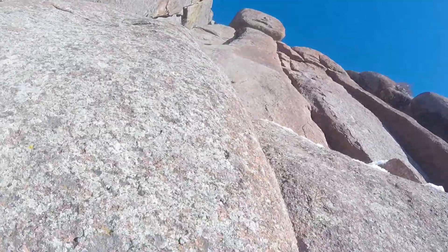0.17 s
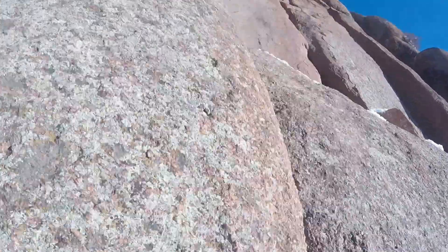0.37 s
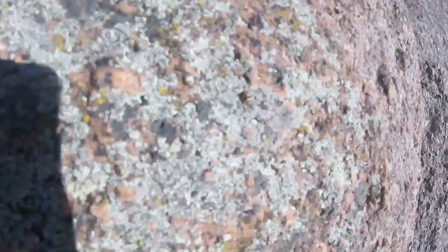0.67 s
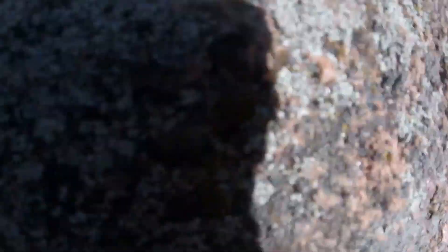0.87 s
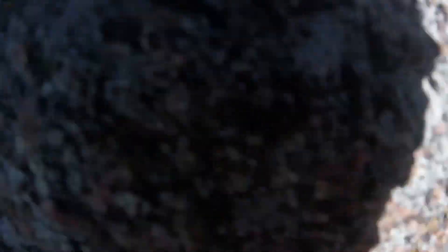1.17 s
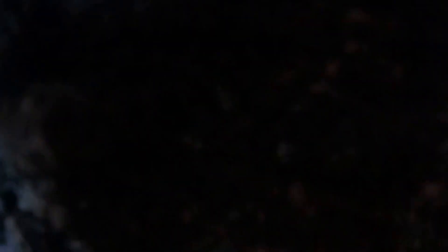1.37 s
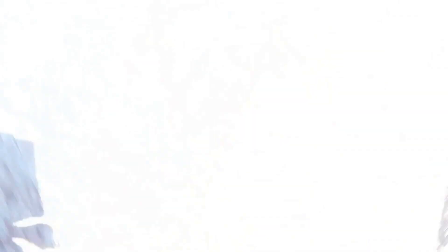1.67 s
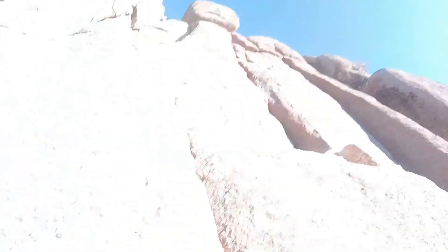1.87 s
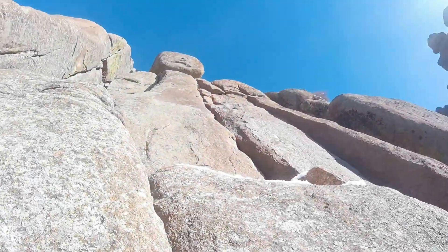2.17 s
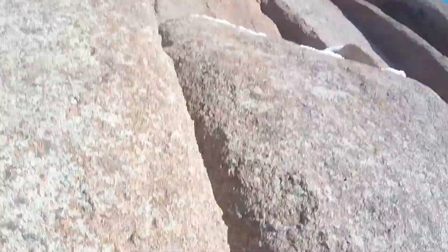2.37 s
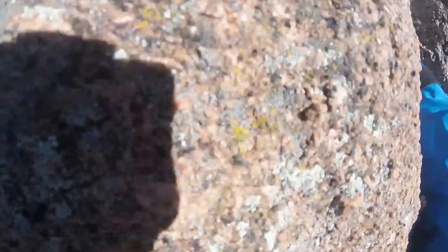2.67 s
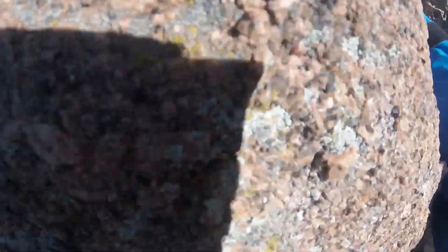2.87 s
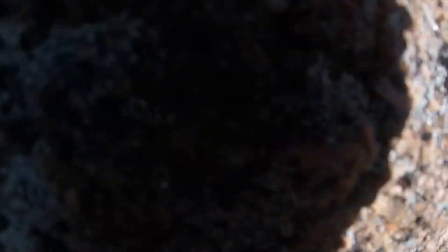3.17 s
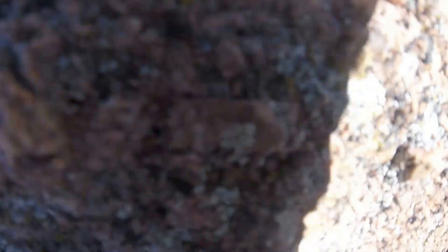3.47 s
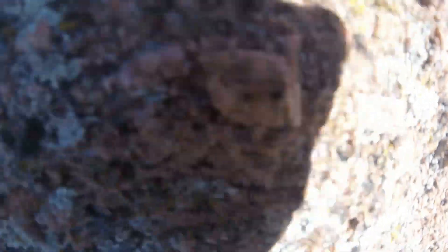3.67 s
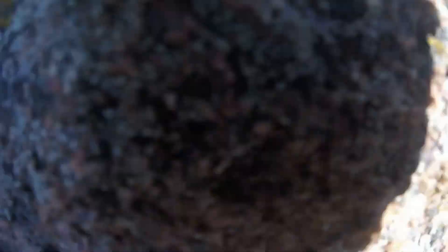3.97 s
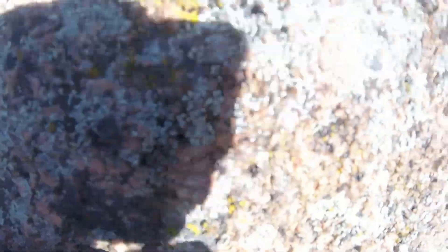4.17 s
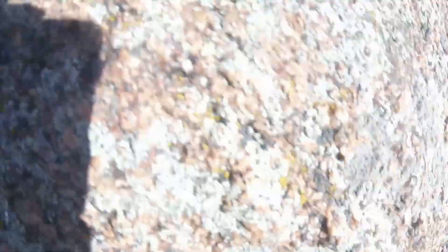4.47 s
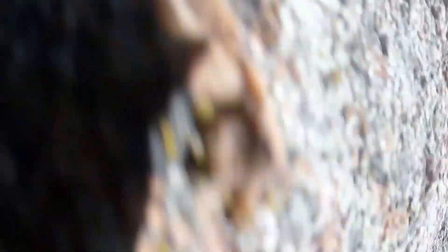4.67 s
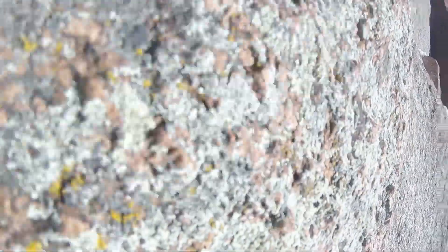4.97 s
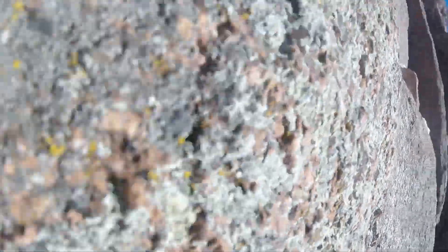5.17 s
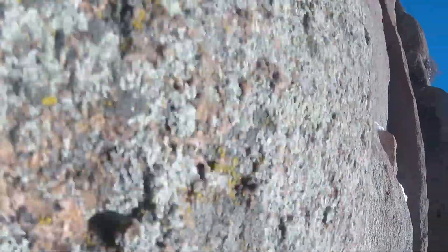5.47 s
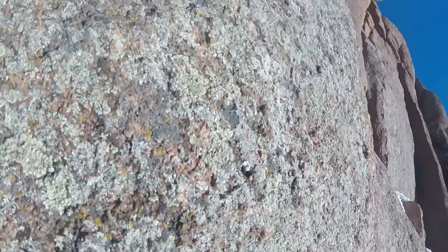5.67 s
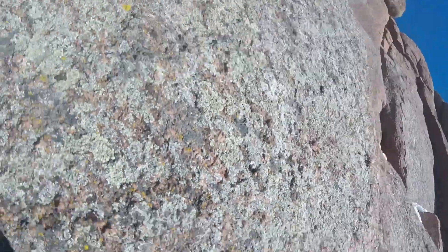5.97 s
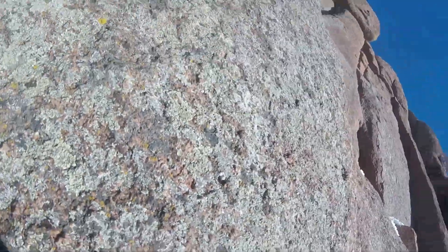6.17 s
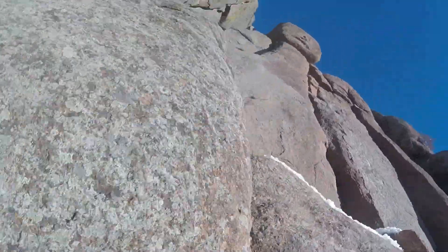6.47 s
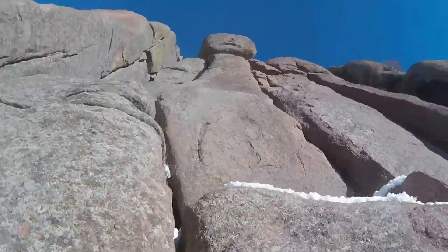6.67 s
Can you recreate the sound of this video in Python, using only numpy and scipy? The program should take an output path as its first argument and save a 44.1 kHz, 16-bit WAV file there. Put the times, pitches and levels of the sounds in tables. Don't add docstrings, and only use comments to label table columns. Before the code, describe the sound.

Wind thumps and roars on a close microphone while a helmet knocks and scrapes hard on rough rock, with faint metal gear ringing and cloth rustling.

```python
import sys
import numpy as np
from scipy import signal
from scipy.fft import rfft, irfft, next_fast_len
from scipy.io import wavfile
from scipy.ndimage import uniform_filter1d, map_coordinates

SR = 44100
rng = np.random.default_rng(int(sys.argv[2]) if len(sys.argv) > 2 else 0)


def voltage_ratio(decibels):
    exponent = np.asarray(decibels, float) / 20
    return 10 ** exponent


def to_wav(s):
    ch = np.atleast_2d(s).T
    pcm = np.round(np.clip(ch, -1, 1) * 32767)
    wavfile.write(sys.argv[1], SR, pcm.astype(np.int16))


N = 300321
TIME = np.arange(N) / SR

# (frequency [Hz], density [dB per Hz])
GRIT_SPECTRUM = [(410, -27), (700, -8), (1100, -1.5), (1300, 1), (1700, -2), (2300, 4.5), (2900, -9),
                 (3400, -1.5), (4000, -22), (5000, -39.5)]
# (frequency [Hz], density [dB per Hz])
SHELL_SPECTRUM = [(40, -29.5), (100, -0.5), (160, -1), (300, 0), (630, -11), (1000, -23), (2000, -87.5)]
# (frequency [Hz], density [dB per Hz])
EDGE_SPECTRUM = [(2800, -27), (3900, 2), (4500, -6), (5200, -1), (6500, -11.5), (7500, -25), (9000, -49)]
# (frequency [Hz], density [dB per Hz])
SPARK_SPECTRUM = [(10500, -40), (12000, -4.5), (13200, 0.5), (14300, -3.5), (15000, -52)]
# (frequency [Hz], density [dB per Hz])
RUSTLE_SPECTRUM = [(410, -42), (700, -14.5), (1080, -4.5), (1320, 3), (1630, -3.5), (2200, 1), (3670, -11),
                   (4020, -8.5), (4440, -15.5), (5070, -13.5), (10000, -38), (13000, -46), (22000, -120)]


def unit(x):
    return x / np.sqrt(np.mean(x ** 2) + 1e-20)


def curves(rows):
    s, *cols = np.transpose(rows)
    return [np.interp(TIME, s, c) for c in cols]


def wobble(rate):
    knots = rng.standard_normal(int(N * rate / SR) + 4)
    return map_coordinates(knots, [TIME * rate])


def filtered(x, response):
    m = next_fast_len(N + SR // 2)
    return irfft(rfft(x, m) * response(np.fft.rfftfreq(m, 1 / SR)), m)[:N]


def coloured(x, spectrum):
    f, db = np.transpose(spectrum)
    return unit(filtered(x, lambda hz: voltage_ratio(np.interp(np.log(hz + 1), np.log(f + 1), db, -120, -120))))


def grains(per_s, spread_db, bed):
    happens = rng.random(N) < per_s / SR
    size = voltage_ratio(spread_db * rng.exponential(size=N))
    slips = happens * size * rng.standard_normal(N)
    return unit(slips) + bed * rng.standard_normal(N)


def resonance(hz, centre, width):
    return 1j * hz * width / (centre ** 2 - hz ** 2 + 1j * hz * width)


def add(out, s, sound):
    part = out[round(s * SR):][:len(sound)]
    part += sound[:len(part)]


def joined(tables, fade):
    rows = []
    for k, table in enumerate(tables):
        if k == 0 or table[0][0] - rows[-1][0] > 2 * fade:
            if rows:
                rows += [(rows[-1][0] + fade, -110, *rows[-1][2:])]
            rows += [(table[0][0] - fade / 2, -110, *table[0][2:])]
        rows += table
    return rows + [(rows[-1][0] + fade, -110, *rows[-1][2:])]


def strokes(tables, fade):
    return uniform_filter1d(curves(joined(tables, fade)), size=60, axis=1)


def knocks():
    # (time [s], peak [dB], frequency [Hz], t60 [s])
    pulls = [(1.4816, -20, 250, 0.023), (1.4864, 7.5, 440, 0.0051), (1.4894, 6, 560, 0.0045),
             (3.3396, 4.5, 424, 0.006), (1.4925, -16, 42, 0.14), (4.8606, -7, 198, 0.013),
             (4.86, -5, 44.2, 0.14), (4.877, -5, 147, 0.11), (4.8975, -1, 150, 0.054),
             (4.922, -11.5, 95, 0.18), (5.261, -15.5, 60, 0.081)]
    # (time [s], peak [dB], frequency [Hz], t60 [s])
    pushes = [
        (1.4866, 3, 205, 0.011),
        (1.4832, -13, 90, 0.03),
        (3.3397, 2, 52, 0.071),
        (3.3407, 0.5, 270, 0.017),
        (4.869, 1.5, 70, .05),
        (5.274, -7, 110, 0.019),
        (5.284, -6, 115, 0.082),
    ]
    # (time [s], peak [dB], frequency [Hz])
    bumps = [(1.546, -19.5, 250), (1.648, -31.5, 116), (1.892, -33.5, 120), (2.408, -35, 121),
             (2.571, -36, 109), (3.214, -43.5, 243), (4.066, -33, 398), (5.2064, -20, 135),
             (5.344, -18.5, 122), (5.683, -42.5, 130), (6.058, -37.5, 277)]
    bump_cycles = 7
    blow_rise_cycles, bump_rise_cycles = 0.045, 0.42
    nudges = [(s, db + 3.5, hz, bump_cycles / hz) for s, db, hz in bumps]
    groups = (-1.01, blow_rise_cycles, pulls), (0.93, blow_rise_cycles, pushes), (-1.04, bump_rise_cycles, nudges)
    out, t = np.zeros(N), TIME[:SR // 2]
    for swing, rise, blows in groups:
        for s, db, hz, t60 in blows:
            onset = 1 - np.exp(-t * hz / rise)
            add(out, s, swing * voltage_ratio(db - 60 * t / t60) * np.sin(2 * np.pi * hz * t) * onset)
    return out


def drag():
    # (time [s], pressure [dB], sharpness [dB])
    scrapes = [
        [(1.482, -29.5, -40), (1.485, -24, -28), (1.494, -25, -28), (1.5, -41, -22), (1.514, -53.5, -59.5),
         (1.53, -49.5, -64.5)],
        [(1.535, -52.5, -50), (1.575, -43, -36), (1.599, -55.5, -38), (1.62, -76, -29), (1.648, -60, -22),
         (1.658, -60, -28), (1.668, -80, -39)],
        [(3.341, -17.5, -36), (3.354, -29.5, -29), (3.391, -30.5, -32.5), (3.41, -32, -28), (3.428, -35, -30),
         (3.44, -58, -39)],
        [(4.861, -28, -40.5), (4.866, -23, -46.5), (4.89, -25.5, -34), (4.913, -22, -26), (4.917, -14.5, -18),
         (4.935, -28.5, -19.5), (4.963, -45.5, -54.5), (5.0, -68.5, -49.5)],
        [(5.203, -46, -42), (5.237, -49, -46), (5.262, -41.5, -48), (5.284, -19, -61), (5.3, -31.5, -66),
         (5.31, -39, -59)],
        [(5.311, -33.5, -60), (5.356, -34, -62), (5.375, -71, -44)],
    ]
    # (hollow body over grit [dB], edge over grit [dB])
    contact_balance = [
        (10.5, -14),
        (20.5, -8.5),
        (12, -13.5),
        (13.5, -13),
        (10.5, -9),
        (-4.5, -10),
    ]
    edge_follows = 0.48
    body_stays = 0.088
    marked = []
    for stroke, (body_db, edge_db) in zip(scrapes, contact_balance):
        usual_db = np.median(stroke, axis=0)[1]
        marked.append([(s, db, sharp_db, body_db - body_stays * (db - usual_db), edge_db)
                       for s, db, sharp_db in stroke])
    grit_db, sharp_db, body_db, edge_db = strokes(marked, fade=0.0056)
    slips = voltage_ratio(2.2 * wobble(250)) * grains(2500, 1.8, bed=1.4)
    grit = coloured(slips, GRIT_SPECTRUM)
    body = voltage_ratio(body_db - 5.0) * coloured(rng.standard_normal(N), SHELL_SPECTRUM)
    edge = voltage_ratio(edge_db + edge_follows * (sharp_db + 31.5)) * coloured(slips, EDGE_SPECTRUM)
    return voltage_ratio(grit_db - 7.5) * (grit + body + edge) + fizzing(grit_db + sharp_db - 2)


def fizzing(level_db):
    # (frequency [Hz], density [dB per Hz])
    fizz_spectrum = [(5500, -38.5), (7000, -2), (8500, -1.5), (10500, -2), (12000, -13), (13000, -39.5)]
    top_db = np.clip(1.2 * (level_db + 46.5), -25, 1.5)
    fizz = coloured(rng.standard_normal(N), fizz_spectrum)
    spark = coloured(rng.standard_normal(N), SPARK_SPECTRUM)
    return voltage_ratio(level_db) * (fizz + voltage_ratio(top_db) * spark)


def cracks():
    # (time [s], peak [dB], edge [dB], spark over peak [dB])
    breaks = [(1.4866, -4.5, -9.5, -35), (1.4887, -10, -19.5, -39.5), (1.5439, -62, -7, -45),
              (1.6516, -47.5, -10, -35), (2.442, -64, 15.5, -40), (3.339, -10.5, -14, -36),
              (3.4252, -27, -4, -52), (3.684, -61.5, 6.5, -40), (4.8658, -20.5, -17.5, -46),
              (4.8857, -10, -16.5, -45), (4.8984, -11, -15.5, -33.5), (4.9058, -14, -21.5, -22),
              (4.917, -6, -10.5, -20.5), (4.9193, -5.5, -15.5, -25.5), (4.9295, -30.5, -23, -29.5),
              (5.2404, -36.5, -13.5, -50), (5.2809, -16, -30, -75), (5.2884, -19, -32, -67.5),
              (5.3526, -25, -34, -52)]
    t60_s, rise_s = 0.008, 0.0004
    colours = GRIT_SPECTRUM, EDGE_SPECTRUM, SPARK_SPECTRUM
    noises = [coloured(rng.standard_normal(N), colour) for colour in colours]
    gain, t = np.zeros((3, N)), TIME[:SR // 20]
    for s, db, edge_db, spark_db in breaks:
        burst = voltage_ratio(db + 2.0) * (1 - np.exp(-t / rise_s)) ** 2
        for part, share_db, lasts in zip(gain, (0, edge_db + 4.5, spark_db), (1, 1, 1.3)):
            add(part, s, burst * voltage_ratio(share_db - 60 * t / (lasts * t60_s)))
    return (gain * noises).sum(axis=0)


def metal():
    # (frequency [Hz], level [dB], t60 [s])
    modes = [(1777, 1, 0.5), (1822, -12, .5), (2213, -9.5, 0.3), (2490, -14.5, 0.15), (2659, -14.5, 0.22)]
    # (time [s], level [dB], third, fourth and fifth mode over their usual share [dB])
    strikes = [
        (1.488, -39, -10, -15.5, 6),
        (3.4, -52, 6, -5, 14),
        (4.935, -47, 5, 6, 10),
        (5.3, -55, 1, -6, 8),
    ]
    out, t = np.zeros(N), TIME[:SR // 2]
    onset = 1 - np.exp(-t / 0.003)
    for s, db, *upper_db in strikes:
        for (hz, level, t60), extra_db in zip(modes, [0, 0, *upper_db]):
            envelope = voltage_ratio(db + level + extra_db - 72 * t / t60) * onset
            add(out, s, envelope * np.sin(2 * np.pi * hz * t))
    return out


def ticks():
    # (time [s], peak [dB], lowest mode [dB], second mode [dB])
    gear_taps = [(2.3808, -53, -11, -15), (2.494, -66, 2, -15), (2.6135, -56, -12, -10),
                 (3.244, -47.5, -10, -15), (4.0687, -56.5, -2.5, -19), (4.547, -32.5, -19, -23),
                 (4.6237, -33, -21, -19), (5.2086, -41.5, -10.5, -11), (5.221, -42.5, -25, -20),
                 (5.24, -44, -24, -16.5), (5.3958, -60.5, -1, -2), (5.684, -27, -24, -17.5),
                 (5.906, -58.5, -0.5, -6), (6.0683, -51, -21.5, -17), (6.324, -46, -37, -29),
                 (6.426, -26.5, -27, -21)]
    # (frequency [Hz], width [Hz], level [dB])
    housing_modes = [(1344, 94, -8), (1953, 170, -7), (2684, 152, -11), (3375, 116, -30.5),
                     (3800, 170, -33.5), (4980, 340, -33.5)]
    s, db, low_db, second_db = np.transpose(gear_taps)
    at = np.round((s - 0.001) * SR).astype(int)
    out, contact = np.zeros(N), np.zeros(N)
    for k, (centre, width, level) in enumerate(housing_modes):
        mode_db = [low_db, second_db, *[level] * 4][k]
        taps = np.zeros(N)
        taps[at] = voltage_ratio(db + mode_db) * SR / width / 1.4
        mode = lambda hz: resonance(hz, centre, width) * resonance(hz, centre, 2.9 * width)
        out += (-1) ** k * filtered(taps, mode)
    contact[at] = voltage_ratio(db - 2.5)
    t = TIME[:SR // 40]
    puff = voltage_ratio(-60 * t / 0.014) * (1 - np.exp(-t / 0.0014)) ** 2
    rattle = signal.fftconvolve(contact, puff)[:N]
    return out + rattle * coloured(rng.standard_normal(N), RUSTLE_SPECTRUM)


def slides():
    # (start [s], end [s], frequency [Hz], width [Hz], level [dB])
    songs = [
        (.85, 1.33, 2190, 90, -70),
        (.87, 1.05, 4150, 150, -76),
        (6.07, 6.27, 2720, 80, -68),
        (6.5, 6.63, 3980, 120, -72),
        (6.66, 6.81, 3950, 120, -71),
        (6.52, 6.81, 3300, 120, -74),
        (5.11, 5.165, 3400, 150, -79),
        (5.165, 5.21, 3330, 100, -75),
    ]
    out = np.zeros(N)
    for start, end, hz, width, db in songs:
        tone = unit(filtered(rng.standard_normal(N), lambda f: resonance(f, hz, width) ** 2))
        tone = unit(tone / np.sqrt(0.4 + np.abs(uniform_filter1d(tone ** 2, size=500))))
        fade = np.clip(np.minimum(TIME - start, end - TIME) / 0.013, 0, 1)
        out += voltage_ratio(db) * fade * tone
    return out


def cloth():
    fabric_rubs = [(0.567, .71, .79, -60, 6), (0.846, 0.953, 1.13, -58.5, -5),
                   (1.668, 1.708, 1.77, -63.5, -5), (1.83, 1.89, 2.1, -65.5, -14),
                   (2.369, 2.409, 2.53, -51, 5.5), (2.51, 2.556, 2.67, -51, -6),
                   (2.596, 2.635, 2.7, -58, -3.5), (3.215, 3.221, 2.82, -57.5, 19.5),
                   (3.3, 3.34, 3.43, -68, 24), (3.98, 4.044, 3.8, -66, 9), (4.066, 4.09, 4.3, -62, -3),
                   (5.685, 5.703, 5.8, -59.5, 5)]
    # (time [s], effort [dB], body over it [dB])
    sleeve_pull = [(6.04, -69.5, 11), (6.074, -54, 1), (6.1, -64.5, 8), (6.29, -65.5, -1),
                   (6.322, -54.5, -5), (6.35, -63, 8), (6.48, -59, 5), (6.509, -57, -5), (6.81, -60.5, -16)]
    swell_db, sag_db = 13.5, 22.5
    rubs = []
    for start, top, end, db, body in fabric_rubs:
        rubs.append(sorted([(start, db - swell_db, body), (top, db, body), (end, db - sag_db, body)]))
    level_db, body_db = strokes(rubs + [sorted(sleeve_pull)], fade=0.018)
    rub = grains(3700, 0.56, bed=2.3)
    flutter_db = 1.6 * wobble(60)
    rustle = coloured(rub, RUSTLE_SPECTRUM)
    body = voltage_ratio(body_db - 7.5) * coloured(rub, SHELL_SPECTRUM)
    return voltage_ratio(level_db - 1.0 + flutter_db) * (rustle + body)


def gain_control():
    # (time [s], depth [dB])
    ducks = [
        (0.0, 8),
        (1.58, 15.5),
        (3.4, 10.5),
        (4.961, 13),
        (5.36, 7.5),
    ]
    pull_s, hold_s, recover_db_per_s = 0.07, 0.035, 18
    dips = []
    for s, depth in ducks:
        falling = depth * (1 + (TIME - s) / pull_s)
        recovering = depth - recover_db_per_s * (TIME - s - hold_s)
        dips.append(np.clip(np.minimum(falling, recovering), 0, depth))
    return -np.max(dips, axis=0)


def wind():
    # (time [s], level [dB])
    gusts = [(0.0, -29), (0.2, -32.5), (0.72, -24.5), (1.1, -27.5), (1.9, -40), (2.22, -38), (2.62, -23.5),
             (3.32, -23), (3.66, -38), (3.98, -13), (4.22, -19.5), (4.46, -32.5), (4.8, -26.5), (5.14, -38),
             (5.31, -23), (5.6, -35.5), (5.8, -24), (6.81, -25)]
    # (frequency [Hz], density [dB per Hz])
    buffet_spectrum = [(2, -15.5), (8, 0), (16, 2.5), (21, -6), (28, -19.5), (38, -26), (55, -34.5),
                       (90, -91)]
    roar_spectrum = [(14, -38.5), (24, -4.5), (45, -0.5), (110, -8.5), (180, -17.5), (440, -23.5),
                     (850, -40.5), (1600, -47), (3000, -88)]
    hiss_spectrum = [(350, -27.5), (600, -3.5), (1220, -8.5), (2270, -10), (3100, -14), (5030, -17.5),
                     (8000, -23), (11000, -29), (12800, -33), (13600, -57.5)]
    roar_full_db, roar_follows, roar_ducks = -49.5, 0.23, 0.7
    hiss_full_db, hiss_follows = -64, 0.05
    gust_db, = curves(gusts)
    swing_db, gain_db = gust_db - gust_db.mean(), gain_control()
    buffet = coloured(rng.standard_normal(N), buffet_spectrum)
    buffet = unit(buffet / np.sqrt(0.55 + np.abs(uniform_filter1d(buffet ** 2, SR // 8))))
    lumps = voltage_ratio(1.6 * wobble(12) + 2.2 * wobble(30))
    roar = unit(lumps * coloured(rng.standard_normal(N), roar_spectrum))
    hiss = voltage_ratio(1.1 * wobble(11)) * coloured(rng.standard_normal(N), hiss_spectrum)
    roar_db = roar_full_db + roar_follows * swing_db + roar_ducks * gain_db
    hiss_db = hiss_full_db + hiss_follows * swing_db + gain_db
    return voltage_ratio(gust_db) * buffet + voltage_ratio(roar_db) * roar + voltage_ratio(hiss_db) * hiss


def scene():
    contact = knocks() + drag() + cracks()
    gear = metal() + ticks() + slides()
    return (contact + gear + cloth() + wind())[None]


def low_pass(x):
    return signal.sosfilt(signal.butter(12, 15090, fs=SR, output="sos"), x)


def record(dry):
    clipped = dry / (1 + np.abs(dry) ** 12) ** (1 / 12)
    return low_pass(clipped)


dry = scene()
out = record(dry)
to_wav(out)
```